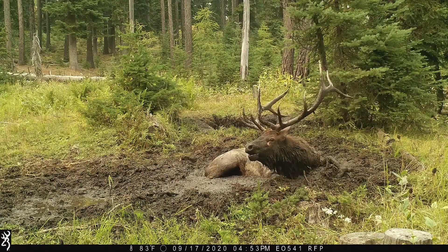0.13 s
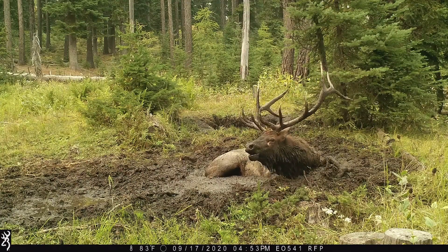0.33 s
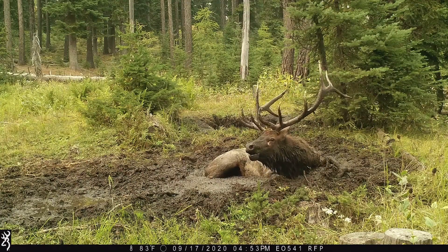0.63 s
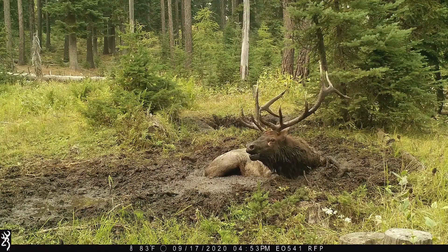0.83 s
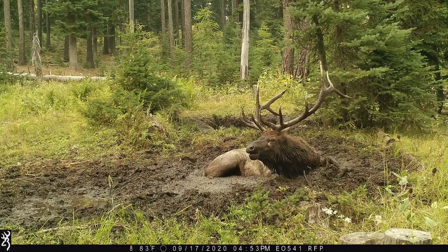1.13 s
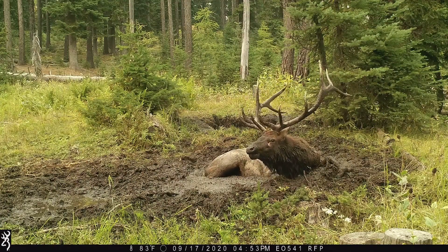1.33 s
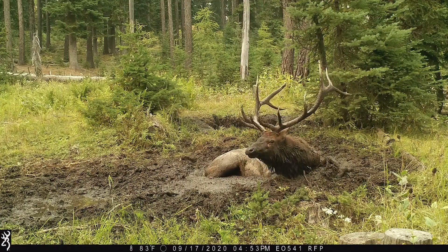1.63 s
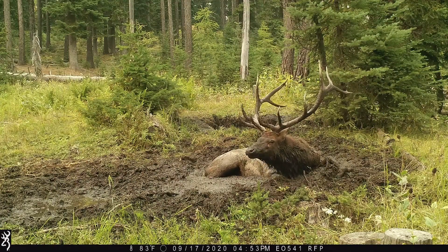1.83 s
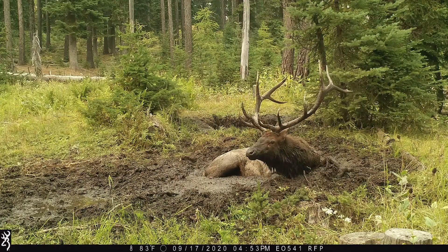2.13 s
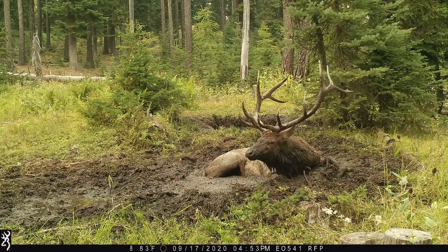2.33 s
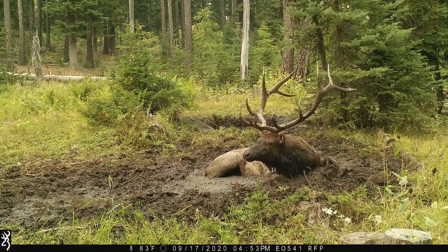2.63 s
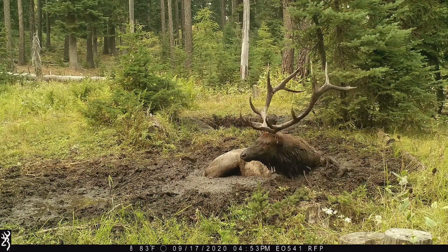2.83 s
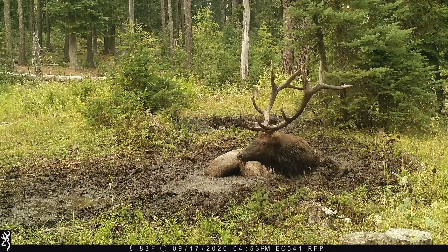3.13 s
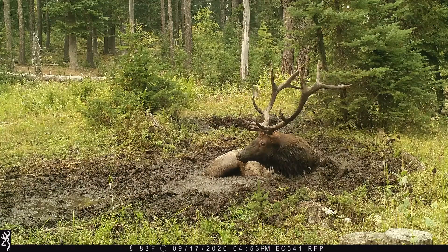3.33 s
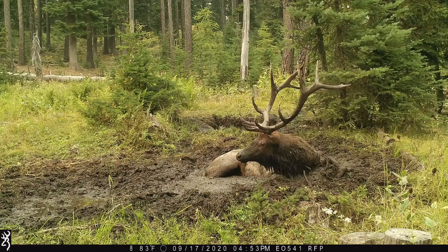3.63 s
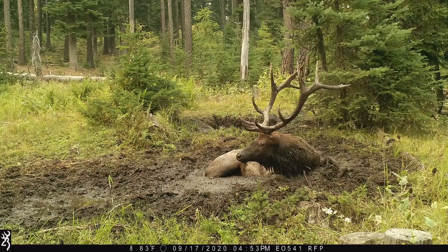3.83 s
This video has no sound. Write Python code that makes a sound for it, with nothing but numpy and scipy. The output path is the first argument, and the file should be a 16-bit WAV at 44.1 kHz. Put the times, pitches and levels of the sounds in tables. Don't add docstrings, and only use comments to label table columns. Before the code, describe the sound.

Bull elk calls: two short shrill whistles breaking into grunts, then hoarse breaths in quiet forest

```python
import sys
import numpy as np
from scipy import signal
from scipy.io import wavfile
from scipy.ndimage import uniform_filter1d

SR = 44100
rng = np.random.default_rng(int(sys.argv[2]) if len(sys.argv) > 2 else 0)


def unload_wav(signal):
    wavfile.write(
        sys.argv[1],
        SR,
        np.round(np.clip(np.atleast_2d(signal).T, -1, 1) * 32767).astype(np.int16),
    )


N = 176400

# time in seconds, pitch in Hz.
FIRST_PITCH = [(0, 1425), (.012, 1440), (.025, 1450), (.042, 1499), (.15, 1508), (.2, 1530), (.225, 1530)]
FIRST_DROP = [(.23, 1320), (0.243, 1281), (.248, 1066), (0.289, 1008)]
SECOND_PITCH = [(.635, 1375), (.648, 1286), (.67, 1299), (.7, 1308), (.737, 1295), (.748, 1072),
                (.757, 989), (.79, 982)]
# time in seconds, then fundamental, octave and higher partials in dB.
FIRST_EFFORT = [(0, -16.5, -27.5, -35), (0.03, -25, -17.5, -23), (0.043, -14, -13.5, -28.5),
                (0.086, -2.5, -15.5, -30), (0.122, -1, -3.5, -43), (0.192, -8, 3, -25),
                (0.219, 13.5, 2, -26), (0.25, 0, -34, -23.5), (0.288, -31, -56.5, -63)]
SECOND_EFFORT = [(0.633, -56, -66, -69.5), (.642, -10.5, -24, -41.5), (.649, 0.5, -25.5, -44.5),
                 (0.702, 5, -23.5, -46.5), (.732, 5, -44.5, -52), (.743, -2, -24.5, -31),
                 (0.754, 6, -23, -31.5), (0.766, -10.5, -16, -45), (.785, -51, -52, -58.5)]
# time in seconds, flutter from 0 to 1.
HOARSENESS = [(0, .25), (.03, .22), (.045, .03), (.185, .03), (.2, .35), (.26, .55), (.6, .03), (.728, .03),
              (.745, .45)]
# centre in Hz, width in Hz, then grunt, gasp and breath levels in dB.
THROAT_MODES = [(117.3, 47, -9.5, -21.5, -27), (240, 90, -4.5, -7.5, -12.5), (682, 190, -13.5, -20.5, -15),
                (1029, 69, -1.5, -2.5, -3), (1300, 98, -5, -5, -0.5), (1573, 160, -12.5, -11.5, -13.5),
                (1926.4, 110, -9, -12.5, -4.5), (2196, 63, -14, -17, -16), (2505, 140, -16.5, -14, -26.5),
                (2920, 150, -15, -15.5, -17), (5000, 2500, -11, -15, -25), (10000, 3800, -24, -30, -39.5)]
# start, rise, hold and fall in seconds, peak in dB.
BREATHS = [
    (.0, .01, .18, .05, -36),
    (.645, .02, .07, .02, -36),
    (1.35, .1, .035, .14, -35),
]
RASPS = [
    (0, .02, .15, .03, -35),
    (.186, .012, .014, .03, -19),
    (.605, .015, .025, .02, -42),
    (1.37, .06, .05, .1, -48),
]
GRUNTS = [
    (.188, .012, .06, .075, -9),
    (.73, .012, .018, .035, -8),
    (.76, .01, .02, .1, -21),
]
CHEST_SWELLS = [
    (.2, 0.039, 0.03, 0.082, -20),
    (.735, 0.0091, 0.018, 0.16, -25.5),
    (1.0, 0.033, .15, .1, -48),
]
RETURNS = [
    (.2, .04, .22, .9, -31),
]
GASPS = [
    (.33, 0.1676, .05, .03, -25),
    (.85, 0.045, 0.23, 0.64, -41),
]
NOSTRIL_SWELLS = [
    (1.77, .04, .04, 0.0402, -57),
]
PUFFS = [
    (2.52, .15, .1, .2, -46),
]
# time in seconds, peak in dB, pitch in Hz, length in seconds.
TICKS = [
    (.861, -36, 5020, .0007),
    (1.078, -44, 2990, .002),
    (2.031, -47.5, 3080, 0.0022),
    (3.129, -48, 2700, .002),
    (3.188, -46, 3050, 0.0038),
    (3.646, -47, 2994, 0.0018),
]
# frequency in Hz, density in dB per Hz.
AIR_SPECTRUM = [(20, 3), (105, -2), (445, -8.5), (818, -13.5), (2000, -21), (6000, -26), (15000, -29)]


def undb(db):
    return 10 ** (np.asarray(db) / 20)


def unit(x):
    return x / np.sqrt(np.mean(x ** 2))


def column(table, index):
    rows = np.array(table)
    return np.interp(np.arange(N) / SR, np.sort(rows[:, 0]), rows[:, index])


def ring(x, hz, width_hz):
    return signal.lfilter(*signal.iirpeak(hz, hz / width_hz, fs=SR), x)


def walk(rate_hz):
    k = int(SR / rate_hz)
    return unit(uniform_filter1d(uniform_filter1d(rng.standard_normal(N), k), k))


def swell(rows):
    t = np.arange(N) / SR
    range_db = 34.5
    shape_db = [-90, -range_db / 2, 0, 0, -range_db, -90]
    total = np.zeros(N)
    for start, rise, hold, fall, peak_db in rows:
        corners_s = np.cumsum([start - .01, .01, rise, hold, fall, .05])
        total += undb(peak_db + np.interp(t, corners_s, shape_db))
    return total


def air_band(rows, hz, width_hz):
    noise = rng.standard_normal(N)
    return swell(rows) * unit(ring(ring(noise, hz, width_hz), hz, 2 * width_hz))


def whistle(pitch, effort):
    t = np.arange(N) / SR
    waver, slip_rad, partial_slope_db = .0006, .8, -4
    hoarse = column(HOARSENESS, index=1)
    phase = 2 * np.pi * np.cumsum(column(pitch, index=1) * (1 + waver * walk(60))) / SR
    phase = phase + slip_rad * hoarse ** 2 * walk(700)
    fundamental = undb(column(effort, index=1)) * np.cos(phase)
    octave = undb(column(effort, index=2)) * np.cos(2 * phase + 0.57)
    ladder = sum(undb(partial_slope_db * k) * np.cos((k + 3) * phase + k * k) for k in range(8))
    tone = fundamental - octave + undb(column(effort, index=3)) * ladder
    flutter = 1 + hoarse * walk(500)
    sounding = (t >= effort[0][0]) * (t < effort[-1][0])
    return np.sqrt(2) * flutter * tone * sounding


def fold_flaps():
    fold_hz, jitter, scatter_db, top_hz = 107.7, .18, 2.5, 2540
    chance = rng.standard_normal((1200, 2))
    periods_s = np.clip(1 + jitter * chance[:, 0], .3, 3) / fold_hz
    at = (np.cumsum(periods_s) * SR).astype(int)
    flaps = np.zeros(N)
    flaps[at[at < N]] = undb(scatter_db * chance[at < N, 1])
    dull = signal.lfilter(*signal.butter(2, top_hz, fs=SR), flaps)
    return unit(dull) / np.sqrt(SR / 2 / top_hz)


def throat_ring(x, index):
    skirt = 3.3
    out = np.zeros(N)
    for k, mode in enumerate(THROAT_MODES):
        hz, width_hz = mode[0], mode[1]
        rung = ring(ring(x, hz, width_hz), hz, min(skirt * width_hz, hz))
        out += (-1) ** k * undb(mode[index]) * rung / np.sqrt(width_hz)
    return out


def throat(rows, folds_db, index):
    rush = rng.standard_normal(N) * undb(1.2 * walk(60))
    air = undb(folds_db) * fold_flaps() + rush
    return throat_ring(air * swell(rows), index) / np.std(throat_ring(air, index))


def breaths():
    return throat(BREATHS, folds_db=-12.5, index=4)


def rasp():
    return air_band(RASPS, hz=2120, width_hz=300)


def wind():
    level_db, gust_db, flicker_db = -44.5, 0.55, -2.5
    out, gust, air = 0, walk(1.5), np.array(AIR_SPECTRUM)
    for hz in 22 * 2 ** np.arange(0, 9.6, .5):
        db = np.interp(np.log(hz), np.log(air[:, 0]), air[:, 1])
        windy = 1 / (1 + hz / 1500)
        noise = ring(ring(rng.standard_normal(N), hz, hz * .6), hz, hz * .6)
        out = out + undb(db + windy * (gust_db * gust + flicker_db * walk(9))) * noise
    return undb(level_db) * unit(out)


def whine():
    whine_hz, rms_db = 7867.2, -44
    return np.sqrt(2) * undb(rms_db) * np.sin(2 * np.pi * whine_hz * np.arange(N) / SR)


def trunks(x):
    near_db, near_t60_s = -30.5, 0.44
    tail_db, tail_t60_s, tail_start_s, tail_top_hz = -41, 2.8, .03, 2000
    echo_db, echo_s, echo_smear_s = -47, .6, .015
    t = np.arange(2 * SR) / SR
    noise = rng.standard_normal((2, len(t))) * np.clip(t / tail_start_s - .5, 0, 1)

    def share(response, db):
        return undb(db) * response / np.linalg.norm(response)

    tail = share(noise[0] * undb(-60 * t / tail_t60_s), tail_db)
    echo = share(noise[1] * np.exp(-((t - echo_s) / echo_smear_s) ** 2), echo_db)
    far = signal.lfilter(*signal.butter(2, tail_top_hz, fs=SR), tail + echo)
    near = share(noise[1] * undb(-60 * t / near_t60_s), near_db)
    return signal.fftconvolve(x, far + near)[:N]


def grunts():
    return throat(GRUNTS, folds_db=-1.5, index=2)


def chest():
    return air_band(CHEST_SWELLS, hz=240, width_hz=110)


def late_return():
    hz, width_hz, third_db = 1535, 18, -22
    third = air_band(RETURNS, 3 * hz, 3 * width_hz)
    return air_band(RETURNS, hz, width_hz) + undb(third_db) * third


def gasps():
    return throat(GASPS, folds_db=-2.5, index=3)


def ticks():
    t = np.arange(N) / SR
    out = np.zeros(N)
    for start, db, hz, length_s in TICKS:
        out += undb(db) * np.exp(-((t - start) / length_s) ** 2) * np.sin(2 * np.pi * hz * t)
    return out


def nostril():
    return air_band(NOSTRIL_SWELLS, hz=3100, width_hz=280)


def puff():
    return air_band(PUFFS, hz=110, width_hz=110)


def scene():
    facing_db = 1
    first = whistle([*FIRST_PITCH, *FIRST_DROP], FIRST_EFFORT)
    elk = whistle(SECOND_PITCH, SECOND_EFFORT) + grunts() + chest()
    elk = elk + gasps() + breaths() + nostril() + rasp()
    scattered = trunks(elk + undb(facing_db) * first) + late_return()
    background = wind() + whine() + ticks() + puff()
    return (first + elk + scattered + background)[None]


def roll_off(x):
    return signal.sosfilt(signal.butter(12, 15490, fs=SR, output="sos"), x)


def record(dry):
    ceiling, knee, low_cut_hz, full_scale, top_hz = .92, 8, 20, .95, 15400
    x = dry / (1 + np.abs(dry / ceiling) ** knee) ** (1 / knee)
    x = signal.lfilter(*signal.butter(1, low_cut_hz, "high", fs=SR), x)
    x = np.clip(x, -full_scale, full_scale)
    x = signal.sosfiltfilt(signal.ellip(6, .1, 40, top_hz, fs=SR, output="sos"), x)
    return roll_off(x)


dry = scene()
out = record(dry)
unload_wav(out)
```